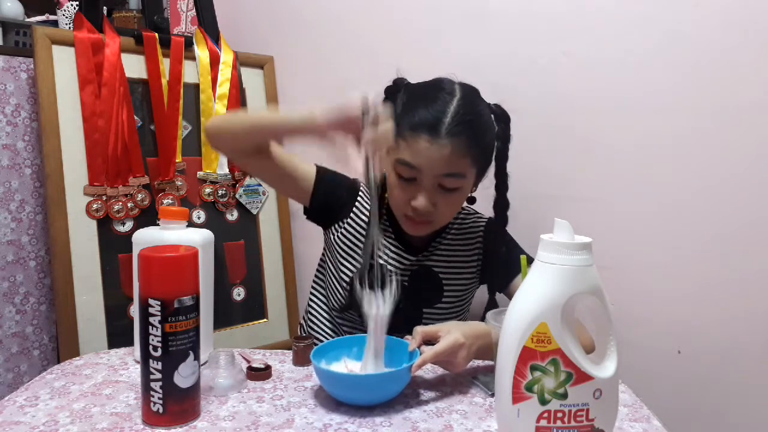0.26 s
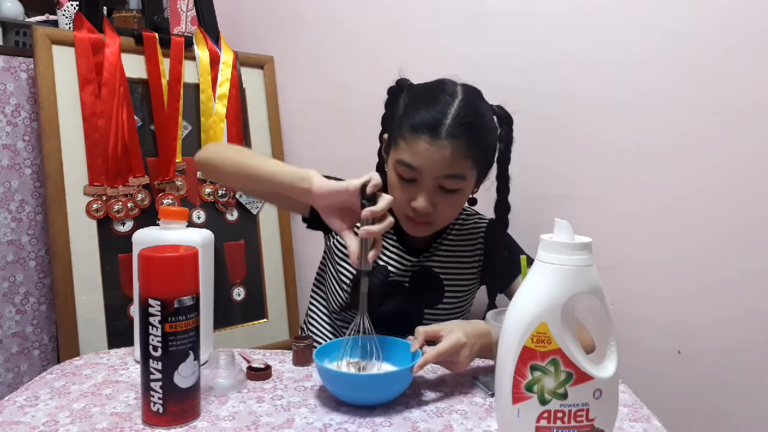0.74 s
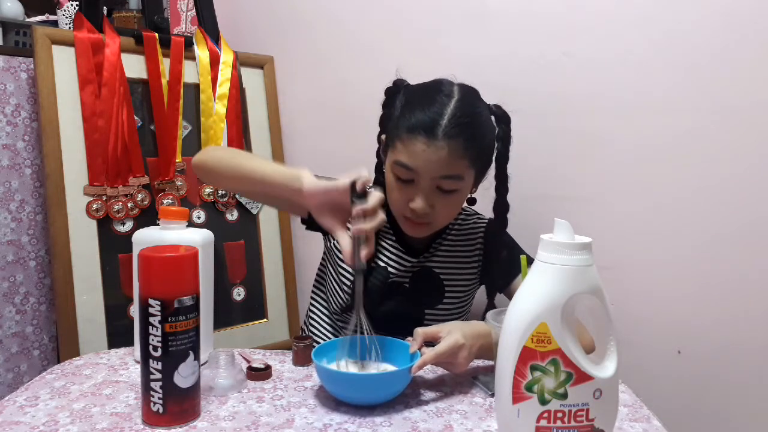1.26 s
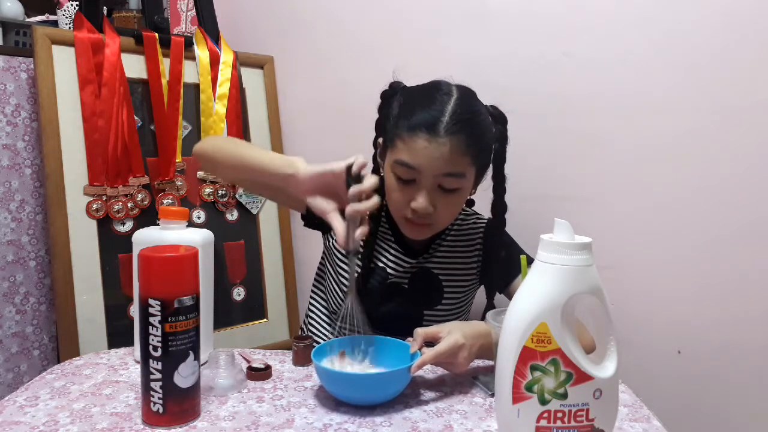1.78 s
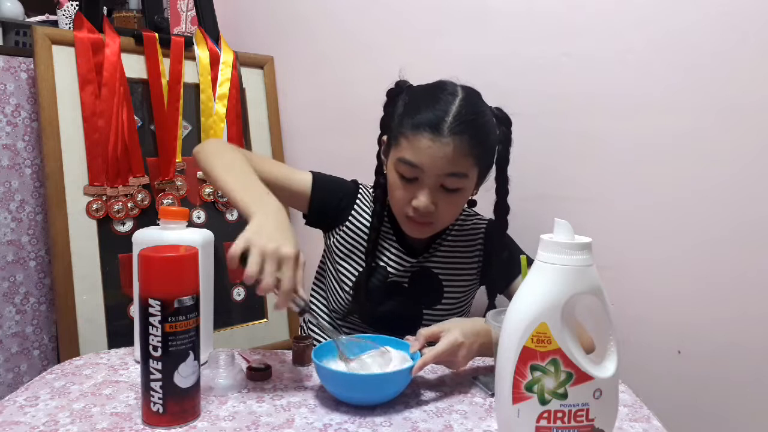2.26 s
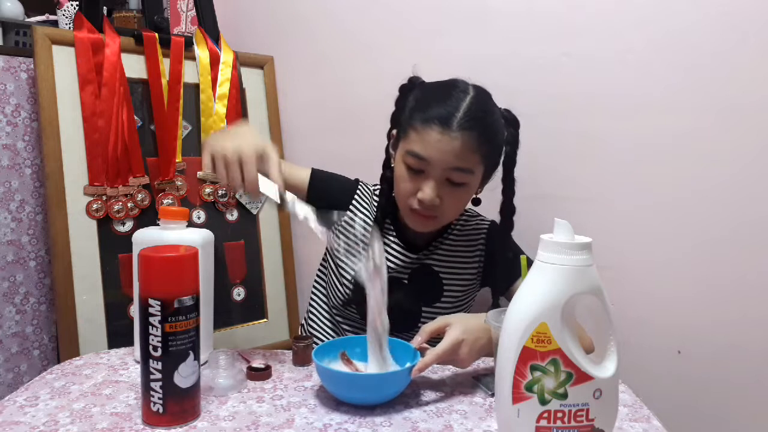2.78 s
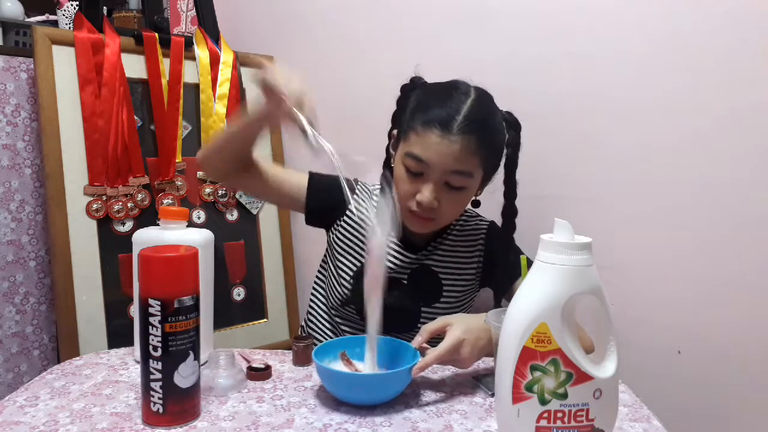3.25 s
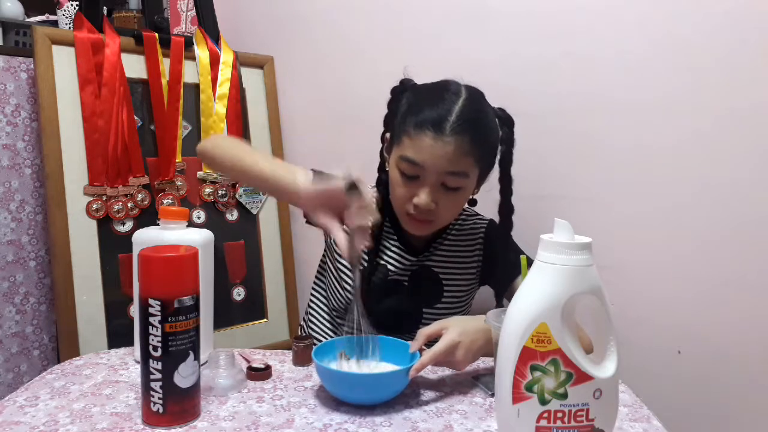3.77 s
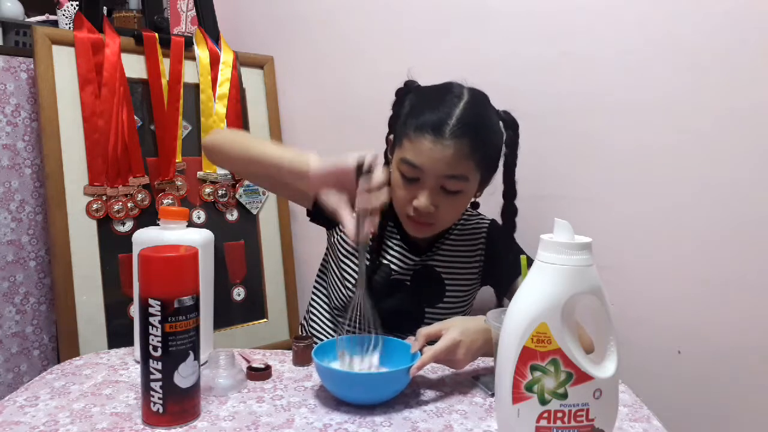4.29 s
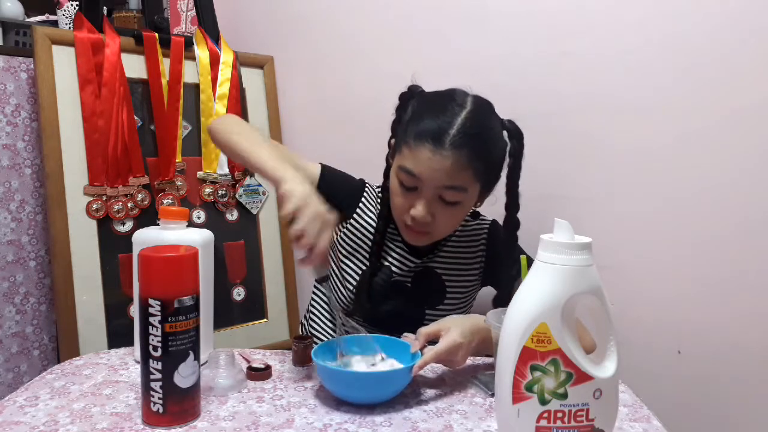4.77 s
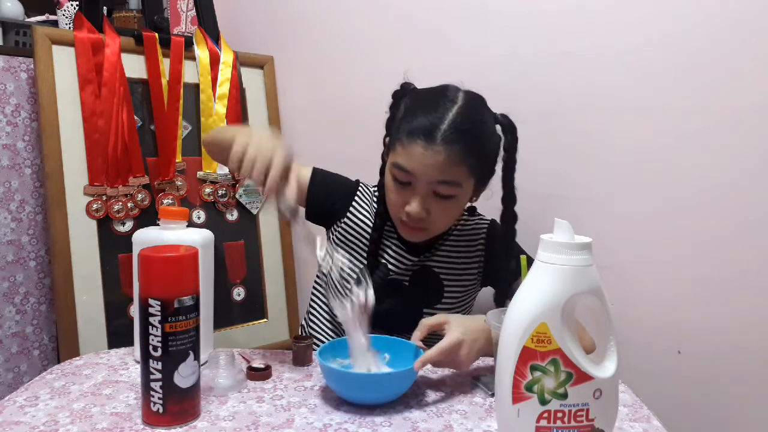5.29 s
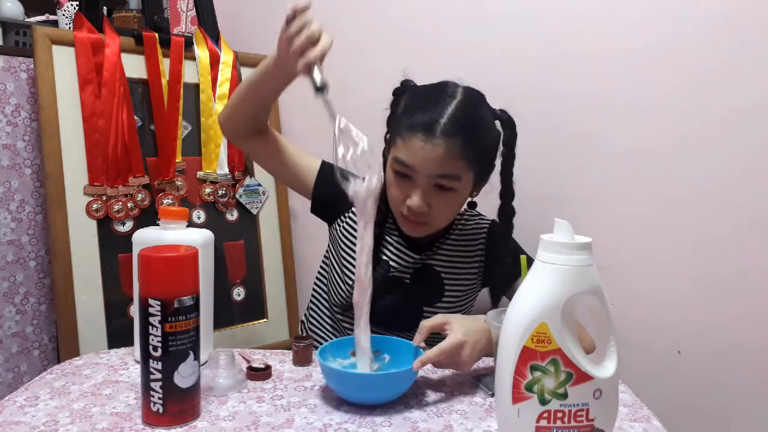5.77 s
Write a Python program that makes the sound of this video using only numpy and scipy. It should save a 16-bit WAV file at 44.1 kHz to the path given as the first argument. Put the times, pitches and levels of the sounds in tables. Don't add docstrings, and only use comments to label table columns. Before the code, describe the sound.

Soft uneven thuds and light metallic clicks of a whisk stirring gooey paste in a plastic bowl, in a quiet small room.

```python
import sys
import numpy as np
from scipy import signal
from scipy.fft import rfft, irfft, next_fast_len
from scipy.io import wavfile
from scipy.ndimage import map_coordinates

SR = 44100
rng = np.random.default_rng(int(sys.argv[2]) if len(sys.argv) > 2 else 0)


def how_loud(loudness_db):
    steps = np.asarray(loudness_db, float) / 20
    return 10 ** steps


def transcribe(signal):
    frames = np.atleast_2d(signal).T
    limited = np.clip(frames, -1, 1)
    pcm = np.round(limited * 32767).astype(np.int16)
    wavfile.write(sys.argv[1], SR, pcm)


N = 266364


def unit(x):
    return x / np.sqrt(np.mean(x ** 2) + 1e-20)


def along(points, hz):
    f, v = np.transpose(points)
    return np.interp(np.log(hz + 1), np.log(f + 1), v)


def wobble(rate):
    knots = rng.standard_normal(int(N * rate / SR) + 4)
    return map_coordinates(knots, [np.arange(N) * rate / SR])


def filtered(x, response):
    m = next_fast_len(x.shape[-1] + 8192)
    spectrum = rfft(x, m) * response(np.fft.rfftfreq(m, 1 / SR))
    return irfft(spectrum, m)[..., :x.shape[-1]]


def noise(spectrum, size):
    return unit(filtered(rng.standard_normal(size), lambda hz: how_loud(along(spectrum, hz))))


def resonances(peaks):
    def response(f):
        total = 0
        for k, (centre, width, db) in enumerate(peaks):
            damping = 1j * f * width
            total = total + (-1) ** k * how_loud(db) * damping / (centre * centre - f * f + damping)
        return total
    return response


def ring(modes, t, spread_db, rise, near_hz=None):
    hz, db, t60 = np.transpose(modes)[:, :, None]
    strength, detune, phase = rng.standard_normal((3, len(modes), 1))
    if near_hz:
        db = db - 34 * np.abs(np.log(hz / near_hz))
    decay = how_loud(db + spread_db * strength - 60 * t / t60)
    x = decay * np.sin(2 * np.pi * hz * (1 + 0.004 * detune) * t + 3 * phase)
    x = x.sum(0) * (1 - np.exp(-t / rise))
    return x / np.abs(x).max()


# f/Hz, t60/s
ROOM_DECAY = [(150, 0.129), (1000, 0.16078), (3000, 0.1916), (10000, 0.23357)]


def walls(x, wet_db):
    hz, t, z = signal.stft(rng.standard_normal(len(x)), SR, nperseg=256)
    decay = how_loud(-60 * t / along(ROOM_DECAY, hz)[:, None])
    tail = signal.istft(z * decay, SR, nperseg=256)[1][:len(x)]
    tail = tail * np.clip(np.arange(len(tail)) / SR / 0.003833, 0, 1)
    return x + how_loud(wet_db) * signal.fftconvolve(x, tail / np.linalg.norm(tail))[:len(x)]


def place(sounds, times):
    out = np.zeros(N + SR)
    for x, s in zip(sounds, times):
        out[round(s * SR):][:len(x)] += x
    return out[:N]


# f/Hz, level/dB per Hz
AIR_COLOUR = [(25, -18), (60, -8), (100, -8), (160, -0.5), (260, -5), (400, -12), (700, -17.5), (1500, -19),
              (3200, -23.5), (6300, -29.5), (8500, -34), (10000, -34), (12500, -31.5), (16000, -36.5)]


def room_tone():
    level_db = -60 + 0.2093 * wobble(3.6074)
    return how_loud(level_db) * noise(AIR_COLOUR, N)


# f/Hz, level/dB per Hz
SIDE_COLOUR = [(15, -45), (25, -21), (53, -13.5), (92, -2.5), (224, -2.5), (891, -1.5), (1020, -1.5),
               (3180, -5.5), (13400, -17.5), (16100, -10.5)]


def side_hiss():
    apart = how_loud(-70.5) * noise(SIDE_COLOUR, N)
    return np.array([apart, -apart])


# start t/s, peak
# t/s, end t/s, f/Hz, peak level/dB
LOW_SWELLS = [(-0.3, 0.2, 0.785, 55.37, -60), (0.999, 1.22, 1.6, 60.5, -56.5),
              (1.297, 1.78, 2.0544, 60.5, -47.5), (2.099, 2.35, 2.47, 63.47, -54.5),
              (2.4, 2.7, 2.694, 59, -63.5), (2.9, 3.45, 3.7, 75.83, -64), (4.099, 4.5, 4.7, 80.5, -57),
              (4.702, 5.25, 5.331, 80.9, -57)]


def hum():
    t = np.arange(N) / SR
    drift = 2 * np.pi * np.cumsum(1.7507 * wobble(3.1718)) / SR
    swell_db = 14.5
    swells = 0
    for start, peak, end, hz, db in LOW_SWELLS:
        away = np.maximum((peak - t) / (peak - start), (t - peak) / (end - peak))
        swells = swells + how_loud(db - 6.5 - swell_db * away ** 2) * np.sin(2 * np.pi * hz * t + drift)
    return how_loud(0.5 * wobble(4.4)) * swells


# t/s, level/dB
STIRRING = [(0.0, -51), (0.55, -59), (0.94, -57), (1.63, -52), (1.75, -48), (1.95, -54.5), (2.32, -54.5),
            (2.98, -61), (3.9, -69), (4.04, -56), (4.54, -53), (5.08, -63), (5.23, -54), (5.4, -60.5),
            (5.79, -77), (6.04, -67.5)]


def murmur():
    force = rng.standard_normal(N) * how_loud(4.286 * wobble(27))
    table = resonances([(170, 31.22, -1.5), (214.63, 22, -6), (280, 23.23, -4),
                        (349.85, 59.85, -5.5), (420.56, 174.16, -11.0)])
    level_db = np.interp(np.arange(N) / SR, *np.transpose(STIRRING))
    return how_loud(level_db - 8) * unit(filtered(force, table))


# t/s, peak level/dB, f/Hz
WIRE_KNOCKS = [(0.0009734, -52, 901.2), (0.20224, -54, 1257.2), (0.765, -49.5, 1150), (1.595, -45, 1103.3),
               (1.616, -44.5, 1046.8), (4.09, -45.5, 1343), (4.149, -17, 687.6), (4.158, -20, 454.38),
               (4.154, -26.5, 902.77), (0.207, -48, 630.2), (2.612, -43, 660), (1.268, -37, 410),
               (5.261, -22, 819.9)]
# t/s, peak level/dB, f/Hz, brightness of the spray/dB
WIRE_CLICKS = [(0.7525, -45, 3006, 0.5), (0.7741, -46.5, 2457, -1.5), (0.9806, -36.5, 2749, -6),
               (0.9925, -41.5, 2296, 0), (1.2371, -36, 2871, 4), (1.2418, -32, 1798, 0.5),
               (2.0987, -48, 1564, -1.5), (2.367, -53, 2345, -2.5), (3.628, -51.5, 1555, 2),
               (4.135, -28, 1888, 2.5), (4.4932, -27, 2290, 3.5), (4.5106, -30, 1900, 4.5),
               (5.0411, -38.5, 2693, 2), (5.0522, -46, 2922, -8), (5.2418, -25.5, 2400, -1),
               (5.2566, -28, 2370, 1.5)]
# t/s, peak level/dB, f/Hz
PASTE_POPS = [(0.383, -53, 6960), (0.7562, -55.5, 4602), (1.2392, -45.5, 4670), (2.108, -53, 8930),
              (2.367, -52, 4712), (3.4069, -49.5, 6852), (3.412, -46.5, 6910), (3.4272, -52.5, 6680),
              (4.146, -43, 5102), (4.8555, -50, 6516), (5.045, -51.5, 5000), (0.002, -48, 1735),
              (2.7, -54, 678)]
# t60/s, width/share of pitch, broad spray level/dB
TICK_KINDS = [
    (0.01874, 0.06907, -22),
    (0.011837, 0.4179, -12),
    (0.023, 0.326, -10),
]


def ticks():
    t, sounds, times = np.arange(SR // 4) / SR, [], []
    for rows, (t60, share, spray_db) in zip((WIRE_KNOCKS, WIRE_CLICKS, PASTE_POPS), TICK_KINDS):
        for s, db, hz, *bright_db in rows:
            width = hz * share * np.exp((db + 39.5) / 28.5)
            spray = (0.6156 * hz, 3 * hz, spray_db + sum(bright_db))
            crack = rng.standard_normal(len(t)) * how_loud(-60 * t / t60) * (1 - np.exp(-t / 0.0008387))
            crack = filtered(crack, resonances([(hz, width, 0), spray]))
            crack = filtered(crack, resonances([(0.5276 * hz, 2.0213 * hz, 0)]))
            sounds.append(how_loud(db - 0.5) * walls(crack / np.abs(crack).max(), wet_db=1.5))
            times.append(s)
    return place(sounds, times)


# t/s, thump peak level/dB, thump f/Hz, bowl body level/dB, wire hardness level/dB
FIRM_PUSHES = [(0.206, -36.5, 214.5, -11, -9), (0.728, -36, 276, -7.5, -12), (0.742, -33, 181.7, -17, -10),
               (0.76, -30.5, 196.7, -8.5, -27.5), (0.774, -38.5, 280, -10, -5),
               (0.974, -31.5, 295, -15, -9), (0.981, -23.5, 191.6, -5, -5), (1.239, -23.5, 194.1, -8, -19),
               (1.571, -34, 188, -3.5, -13), (1.59, -24.5, 173.8, -12, -22), (1.613, -43, 161.2, 0, -6.5),
               (1.79, -27, 222.5, -16.5, -17.5), (2.611, -36.5, 194.7, -4.5, -7.5),
               (2.698, -41.5, 209, -10, -12), (3.903, -30, 210.9, -10, -15),
               (4.086, -32.5, 214.6, -11, -16.5), (4.135, -10.5, 265, -6, -13.5),
               (4.148, -28.5, 280, -1.5, -7), (4.384, -29, 204.8, -13.5, -16),
               (4.49, -35, 297.3, -12.5, -2.5), (4.496, -25, 188, -41.5, -22.5),
               (4.514, -25.5, 196.9, -10, -23.5), (5.242, -7.5, 250, -4.5, -10),
               (5.255, -18.5, 215, 4.5, 2.5)]
# t/s, thump peak level/dB, thump f/Hz
LIGHT_NUDGES = [(0.003, -45, 161.7), (0.285, -48, 224.8), (0.56, -48.5, 239.3), (0.791, -35.5, 230.3),
                (0.861, -43, 224.2), (1.93, -45.5, 213), (1.973, -44, 226.7), (2.027, -46, 170),
                (2.101, -42.5, 166.5), (2.158, -48, 171.6), (2.347, -47, 247.2), (2.516, -44, 229.8),
                (2.638, -38, 213.8), (2.747, -47, 157.6), (2.992, -46, 159), (3.413, -43.5, 217.3),
                (3.634, -45.5, 188), (4.603, -48.5, 201.6), (5.053, -42.5, 210.2)]
# f/Hz, level/dB, t60/s
TABLE_MODES = [(128, -4, 0.16), (154.87, 5, 0.20345), (188, -6, 0.0991), (213, 0, 0.1748),
               (241.87, 0, 0.025), (272.48, 0, 0.1002), (295, -10, 0.043)]
BODY_MODES = [(319.96, -3, 0.20848), (370.84, -12, 0.14348), (417.62, -0.5, 0.11182),
              (450.47, -4.5, 0.09287), (471.48, -3.5, 0.08925), (504.48, 5.5, 0.02918)]
WALL_MODES = [(552.82, 2.5, 0.048), (596.3, -6.5, 0.14), (654.43, 2, 0.11795), (713.84, -3, 0.05935),
              (785.41, -6.5, 0.031)]
RIM_MODES = [(865.84, 1.5, 0.062), (916.92, -0.5, 0.13116), (1031, -30.5, 0.015), (985.5, -17, 0.07),
             (1179.2, 11.5, 0.039245), (1224.2, 0, 0.081), (1380, 5, 0.0408), (1480.3, -9, 0.12),
             (1723, 3, 0.04427), (1839.5, 7, 0.023845), (2052.2, -2.5, 0.051), (2400, 5.5, 0.02587)]
# f/Hz, level/dB per Hz
SNAP_COLOUR = [(500, -108), (1000, 12.5), (2400, -10.5), (3500, -8), (6000, -48), (9000, -23),
               (12000, -24.5), (16000, -27.5)]


def table_thump(t, db, hz):
    thump = ring(TABLE_MODES, t, spread_db=3.5, rise=0.0016692, near_hz=hz)
    seat_db = -3.5 - 0.2728 * max(db + 24.5, 0)
    shorter = np.exp(max(db + 18.5, 0) / 32)
    press = 0.8112 * how_loud(-60 * (t / 0.045444 * shorter) ** 2)
    return thump * (how_loud(seat_db) + press)


def pushes():
    t, sounds = np.arange(SR // 3) / SR, []
    nudge_body_db, nudge_hard_db = -16.5, -14
    contacts = FIRM_PUSHES + [(*row, nudge_body_db, nudge_hard_db) for row in LIGHT_NUDGES]
    for s, db, hz, body_db, hard_db in contacts:
        thump = table_thump(t, db, hz)
        body = how_loud(body_db) * ring(BODY_MODES, t, spread_db=1.5, rise=0.014192)
        wall_db = hard_db - 0.5 + 0.1881 * (db + 28)
        wall = how_loud(wall_db) * ring(WALL_MODES, t, spread_db=0.5, rise=0.0014)
        rim = ring(RIM_MODES, t, spread_db=4.0, rise=0.005492)
        snap = how_loud(-9 - 60 * t / 0.0625) * noise(SNAP_COLOUR, len(t))
        snap = snap * (1 - np.exp(-t / 0.002492))
        low = thump + body + wall
        echo = np.pad(low, (round(0.027 * SR), 0))[:len(t)]
        low = walls(low + how_loud(-10) * echo, wet_db=-5)
        high = how_loud(hard_db - 5.5) * walls(rim + snap, wet_db=0.5)
        sounds.append(how_loud(db - 1.0) * (low + high))
    return place(sounds, [row[0] - 0.0005 for row in contacts])


# start t/s, swell/s, hold/s, release/s, level/dB
SCRAPE_STROKES = [
    (0.258, 0.05296, 0.1552, 0.1193, -65.5),
    (4.696, 0.10732, 0.027, 0.1798, -56),
]
# f/Hz, width/Hz, level/dB
SLIDE_MODES = [(752.65, 86.1, 0.5), (1125.4, 65.6, 1), (1381.1, 46.2, 0), (2002.5, 28.03, -1.5),
               (2528, 100, -32), (3056.6, 42, -9.5)]


def scrape():
    slips = rng.standard_normal(N) * (rng.random(N) < 2500 / SR)
    slips = slips + 0.299 * rng.standard_normal(N)
    slips = slips * how_loud(2.163 * wobble(40))
    broad = [(1268.7, 1467, -13.5), (7000, 4800, -42)]
    wall = unit(filtered(slips, resonances(SLIDE_MODES + broad)))
    t = np.arange(N) / SR
    strokes = 0
    for s, swell, hold, release, db in SCRAPE_STROKES:
        short = np.maximum(1 - (t - s) / swell, (t - s - swell - hold) / release).clip(0)
        strokes = strokes + how_loud(db - 16.5 * short)
    return wall * strokes


def scene():
    def low_cut(f):
        return (1j * f / (125 + 1j * f)) ** 2 * (1j * f / (90 + 1j * f)) ** 2
    mono = room_tone() + hum() + murmur() + ticks() + filtered(pushes(), low_cut) + scrape()
    return np.array([mono, mono])


def roll_off(x):
    return signal.sosfilt(signal.butter(12, 16290, fs=SR, output="sos"), x)


def record(dry):
    top_hz = 15760
    heard = filtered(dry + side_hiss(), lambda hz: hz < top_hz)
    return roll_off(heard - 0.0009)


dry = scene()
out = record(dry)
transcribe(out)
```